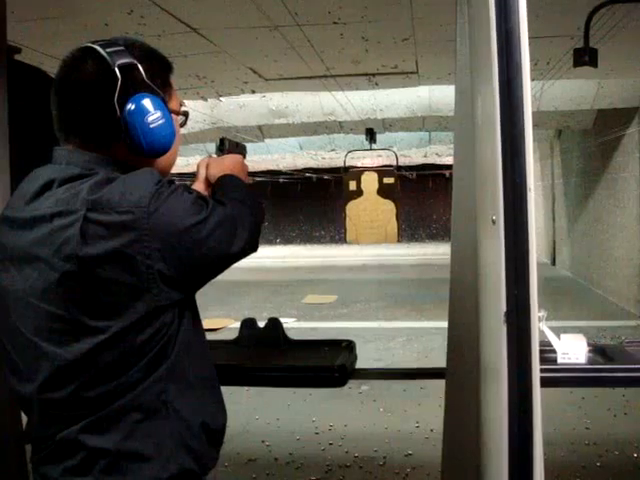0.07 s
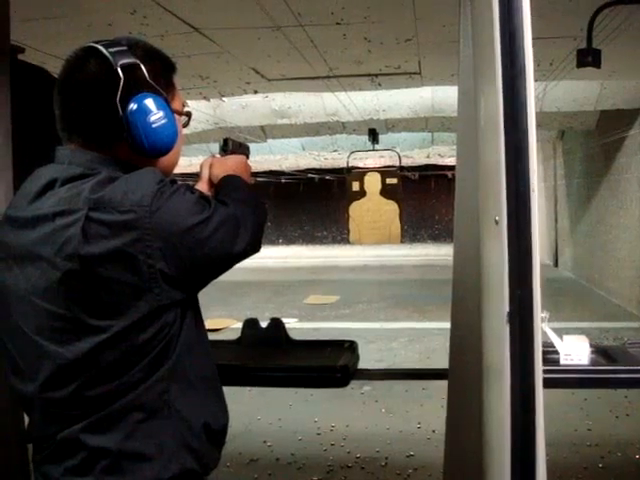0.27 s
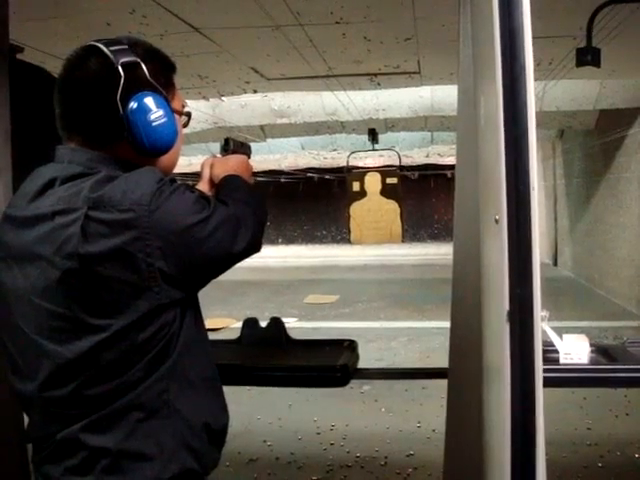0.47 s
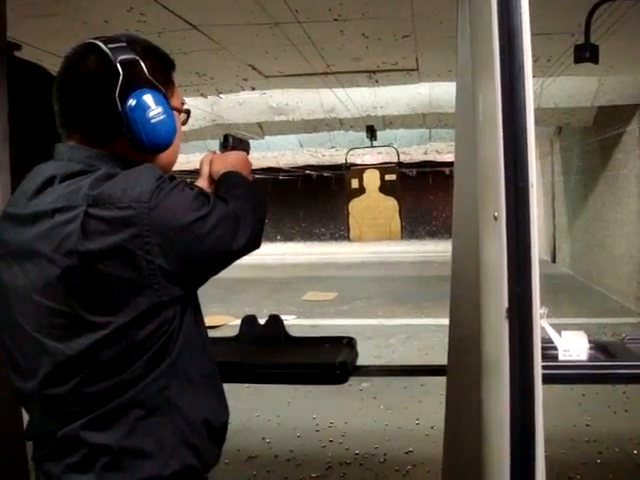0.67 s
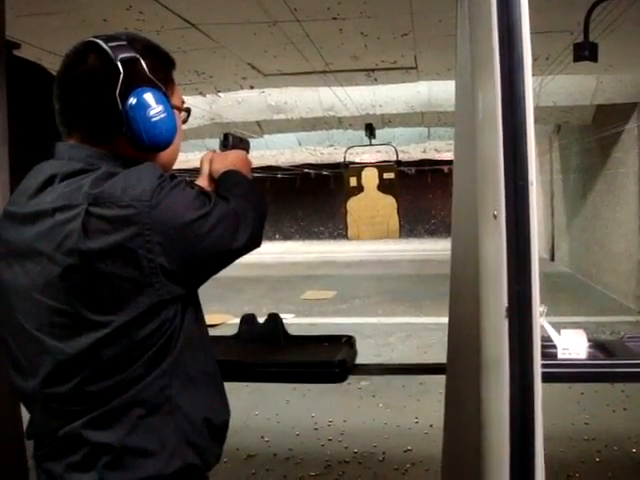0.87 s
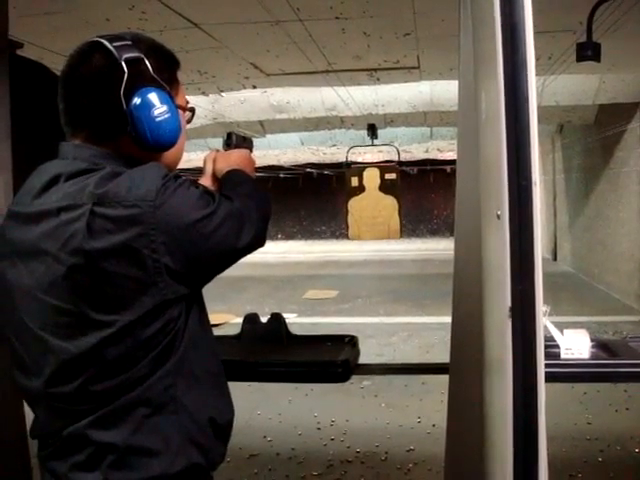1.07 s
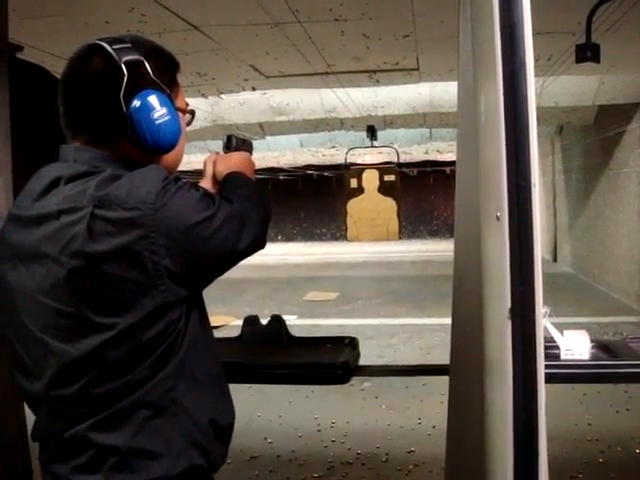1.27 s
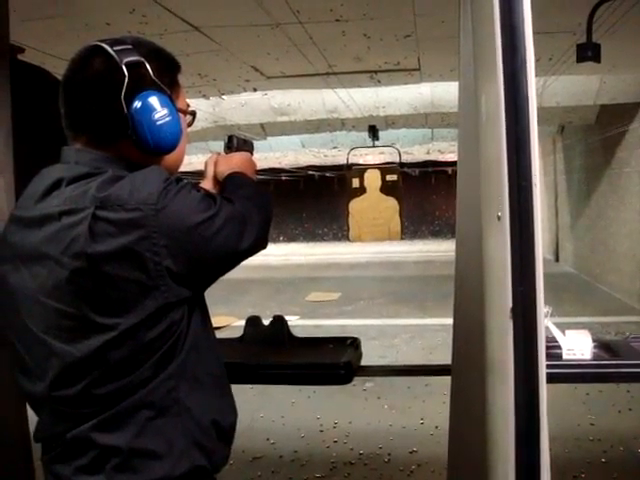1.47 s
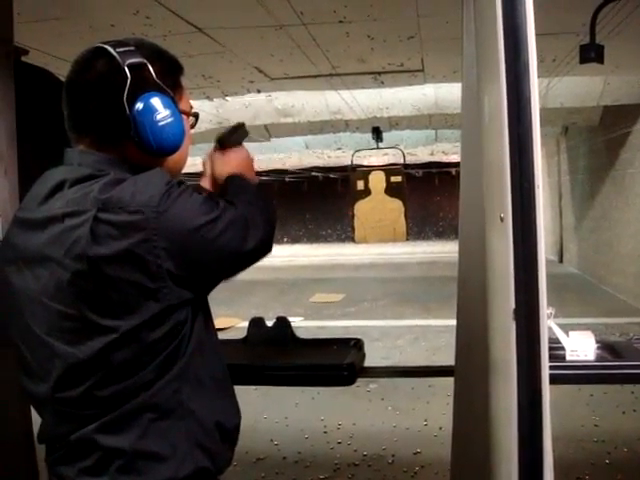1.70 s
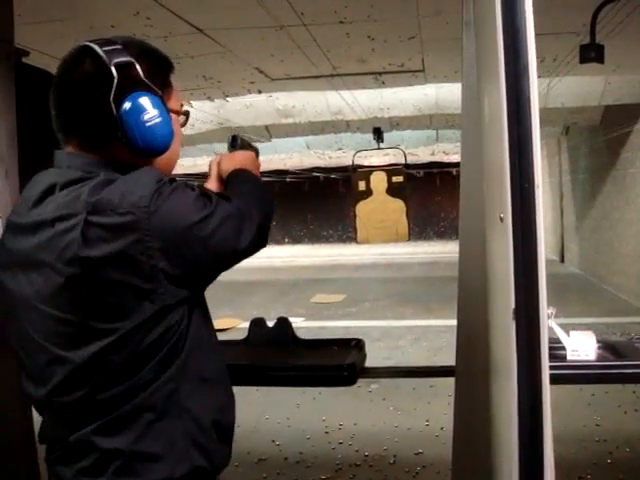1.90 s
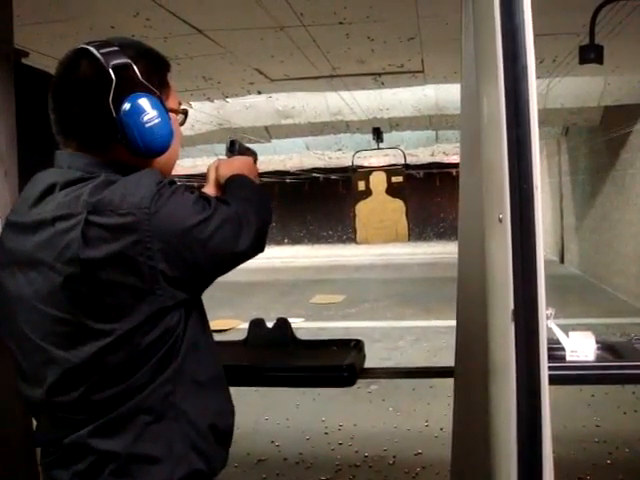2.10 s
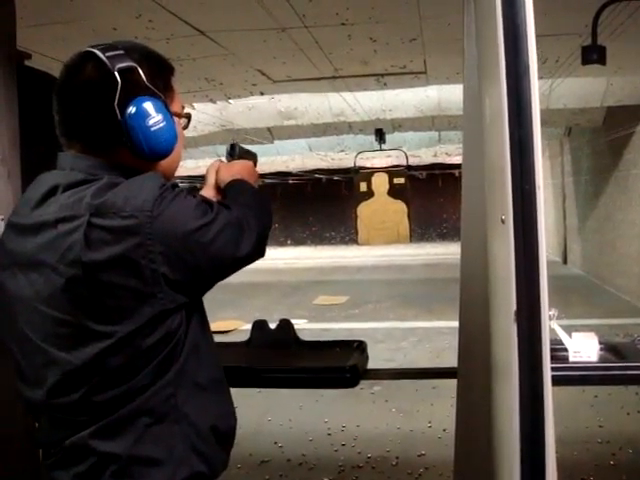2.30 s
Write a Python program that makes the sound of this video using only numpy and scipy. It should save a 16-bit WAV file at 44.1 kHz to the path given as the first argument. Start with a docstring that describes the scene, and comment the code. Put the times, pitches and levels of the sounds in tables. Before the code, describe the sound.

One handgun shot is the main sound, slightly overloading a microphone behind the shooter. Ventilation rushes first, with small metal clicks and dull distant knocks; then the blast echoes through the indoor range and a casing ticks.

```python
"""An indoor shooting range: one handgun shot over the steady rush of the ventilation.
Small metal clicks and dull, far knocks come first. The blast cracks and rattles between the booth walls,
the concrete hall booms as its echoes pile up, and the spent case ticks.
The shot overloads the recorder, which turns everything down at once and only slowly back up."""
import sys
import numpy as np
from scipy import signal
from scipy.fft import rfft, irfft
from scipy.io import wavfile
from scipy.ndimage import uniform_filter1d

SR = 44100
rng = np.random.default_rng(int(sys.argv[2]) if len(sys.argv) > 2 else 0)


def generate_wav(signal):
    """Clip the signal to [-1, 1] and save it as 16-bit WAV at the path in sys.argv[1]."""
    frames = np.transpose(np.atleast_2d(signal))
    scaled = np.clip(frames, -1, 1) * 32767
    pcm = np.round(scaled).astype(np.int16)
    wavfile.write(sys.argv[1], SR, pcm)


N = 108045
T = np.arange(N) / SR
SHOT_S = 1.7657
TREBLE_LIMIT_HZ = 10080

# Tone of the hall's echoes: f/Hz, relative level/dB
HALL_TONE = [(30, -46), (90, -39.5), (150, -22), (270, -12), (380, -0.5), (520, -1.5), (800, -0.5),
             (1300, -3), (1900, -8.5), (3000, -11), (5500, -18.5), (9800, -29.5)]


def amp(db):
    """Turns decibels into a factor to multiply by."""
    return 10 ** (np.asarray(db) / 20)


def unit(x):
    """Scales a signal to an average (rms) level of 1."""
    return x / np.sqrt(np.mean(x ** 2) + 1e-20)


def look_up(table, hz):
    """Reads between a table's rows, with the frequencies spaced by octaves."""
    row_hz, value = np.transpose(table)
    return np.interp(np.log(hz + 1), np.log(row_hz + 1), value)


def colour(x, tone):
    """Gives x the bass and treble of a tone table, at an average level of 1."""
    hz = np.fft.rfftfreq(N, 1 / SR)
    return unit(irfft(rfft(x) * amp(look_up(tone, hz)) * (hz < TREBLE_LIMIT_HZ), N))


def swell(age, rise_s):
    """Rises smoothly from zero to one."""
    return 1 - np.exp(-np.maximum(age, 0) / rise_s)


def fade(age, fade_s, hold_s=0):
    """Silent before age zero, full for hold_s, then falling 60 dB in each fade_s."""
    return (age >= 0) * np.exp(-np.log(1000) * np.maximum(age - hold_s, 0) / np.maximum(fade_s, 1e-3))


def echoes():
    """A dense stream of echoes of random sign and size."""
    return rng.standard_normal(N) * amp(1.5 * rng.standard_normal(N)) * (rng.random(N) < .2)


def ventilation():
    """Air rushes steadily; its swirls make patches of the hiss drift and the level flutter slightly."""
    # Tone of the moving air: f/Hz, relative level/dB
    air_tone = [(15, -58), (25, -30), (48, -34), (92, -12.5), (159, -4.5), (304, -0.5), (390, -2.5),
                (442, 0), (676, -5.5), (728, -3.5), (1170, -7), (1470, -7.5), (2410, -10), (6720, -20.5),
                (9780, -28.5), (12700, -62), (21500, -120)]
    bands = signal.stft(rng.standard_normal(N), nperseg=1024, noverlap=768)[2]  # frequency by time
    patches = uniform_filter1d(rng.standard_normal(bands.shape), size=8, axis=0)
    patches = unit(uniform_filter1d(patches, size=10, axis=1))
    flutter = unit(uniform_filter1d(rng.standard_normal(bands.shape[1]), size=10))
    waver_db = 1.26 * patches + 0.32 * flutter
    air = signal.istft(bands * amp(waver_db), nperseg=1024, noverlap=768)[1][:N]
    return amp(-20.5) * colour(air, air_tone)


def metal_clicks():
    """The gun's parts and the spent case make short, bright ticks, each leaving a faint ring."""
    # Small metal hits: t/s, level/dB
    hits = [(.402, -16.5), (.408, -19.5), (1.5825, -19.5), (1.589, -25), (2.044, -1), (2.362, -17)]
    # Tone of a tick: f/Hz, relative level/dB
    tick_tone = [(500, -36), (2500, -19), (4400, -8), (5400, 0.5), (7200, -5), (9500, -6)]
    # Ringing notes of thin steel: f/Hz, level against the tick/dB, fade time/s
    steel_notes = [(5263, -13, 0.083), (5850, -24, .12), (8650, -16.5, 0.031)]
    tick = colour(rng.standard_normal(N), tick_tone)
    out = np.zeros(N)
    for start_s, db in hits:
        age = T - start_s
        ring = sum(amp(note_db) * np.sin(2 * np.pi * hz * age) * fade(age, fade_s)
                   for hz, note_db, fade_s in steel_notes)
        out += amp(db) * (tick * fade(age, fade_s=.028) + ring)
    return out


def far_knocks():
    """The hall blurs each far blow into a dull knock, a broad band of noise around one pitch."""
    # Blows in the hall: t/s, level/dB, middle f/Hz
    blows = [(0.56, -18.5, 400), (1.561, -21, 1120), (1.593, -20, 1120), (1.604, -18, 395)]
    width_octaves = 0.49
    octave = np.log2(np.fft.rfftfreq(N, 1 / SR) + 1)
    out = np.zeros(N)
    for start_s, db, hz in blows:
        age = T - start_s
        band = np.exp(-.5 * ((octave - np.log2(hz)) / width_octaves) ** 2)
        body = unit(irfft(rfft(rng.standard_normal(N)) * band, N))
        out += amp(db) * body * swell(age, rise_s=0.0028) * fade(age, fade_s=0.2)
    return out


def shot_crack():
    """The gun's blast rattles between the booth walls and slaps back from farther down the lane."""
    # Tone of the crack in the booth: f/Hz, relative level/dB
    crack_tone = [(40, -41), (260, -35), (480, -11), (1000, -14), (2000, -8.5), (3200, -4), (4800, -3),
                  (6500, -8), (9800, -10)]
    # Echoes off walls and panels: t after the shot/s, level/dB
    wall_slaps = [(.03, 21.5), (0.136, 7)]
    age = T - SHOT_S
    crack_level = amp(26.5) * fade(age, fade_s=0.16, hold_s=0.018)
    slap_level = sum(amp(db) * swell(age - delay, rise_s=0.0022) * fade(age - delay, fade_s=0.05)
                     for delay, db in wall_slaps)
    return crack_level * colour(echoes(), crack_tone) + slap_level * colour(echoes(), HALL_TONE)


def hall_boom():
    """Echoes fill the hall, hold for a moment and die away, treble first, over a weak, long tail."""
    # How long the hall stays full: f/Hz, hold time/s
    boom_holds = [(200, .15), (450, 0.069), (900, 0.097), (2000, 0.041), (8000, 0.11)]
    # How long the boom takes to die: f/Hz, fade time/s
    boom_fades = [(100, 1), (400, 0.84), (1000, 0.73), (2000, 0.68), (4500, 0.61), (9500, 0.43)]
    # How long the tail takes to die: f/Hz, fade time/s
    tail_fades = [(200, 1.7), (1000, 1.66), (3500, 1.38), (8000, 1.3)]
    hz, t, bands = signal.stft(colour(echoes(), HALL_TONE), SR, nperseg=256, noverlap=192)
    age = np.maximum(t - SHOT_S, 0)
    boom = amp(23.5) * fade(age, look_up(boom_fades, hz)[:, None], look_up(boom_holds, hz)[:, None])
    tail = amp(8) * fade(age, look_up(tail_fades, hz)[:, None])
    hall = signal.istft(bands * np.hypot(boom, tail), SR, nperseg=256, noverlap=192)[1][:N]
    return hall * swell(T - SHOT_S, rise_s=0.01)


def gain_control(x):
    """The recorder turns itself down as soon as the sound is too loud, then creeps back up."""
    limit_db, recover_db_per_s, listen_s = -2.5, 6, 0.0062
    size = int(listen_s * SR)
    power = signal.fftconvolve(x ** 2, np.ones(size) / size)[size // 2:][:N]
    over_db = np.maximum(10 * np.log10(abs(power) + 1e-12) - limit_db, 0)
    recovery_db = recover_db_per_s * T
    cut_db = np.maximum.accumulate(over_db + recovery_db) - recovery_db
    return x * amp(-cut_db)


def overload(x):
    """Peaks too big for the recorder are rounded off; the crunch this adds has no deep bass."""
    ceiling, hardness, bass_cut_hz = .98, 6, 400
    rounded = x / (1 + abs(x / ceiling) ** hardness) ** (1 / hardness)
    bass_cut = signal.butter(2, bass_cut_hz, "highpass", fs=SR, output="sos")
    return x - signal.sosfiltfilt(bass_cut, x - rounded)


def scene():
    """All the sounds reach one microphone behind the shooter."""
    return (ventilation() + metal_clicks() + far_knocks() + shot_crack() + hall_boom())[None]


def record(dry):
    """The recorder switches on, turns down and overloads at the shot, and loses the highest treble."""
    on_s, rise_s = .041, 0.0064
    x = dry[0] * np.clip((T - on_s) / rise_s, 0, 1)
    x = overload(gain_control(x))
    treble_cut = signal.firwin(601, TREBLE_LIMIT_HZ, window=("kaiser", 9), fs=SR)
    x = signal.fftconvolve(x, treble_cut, "same")
    return np.clip(x, -1, 1)[None]


dry = scene()
out = record(dry)
generate_wav(out)
```